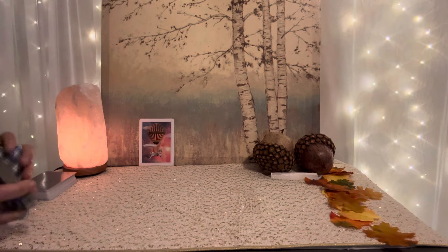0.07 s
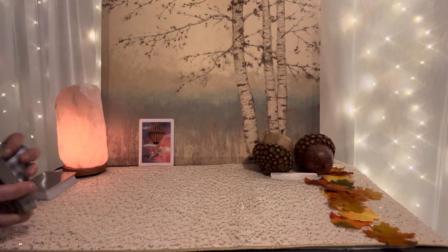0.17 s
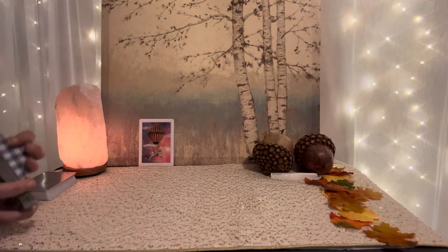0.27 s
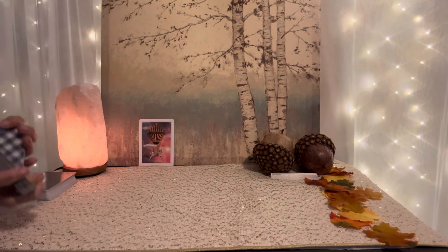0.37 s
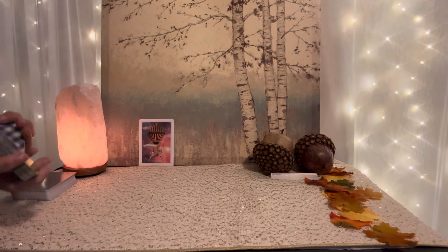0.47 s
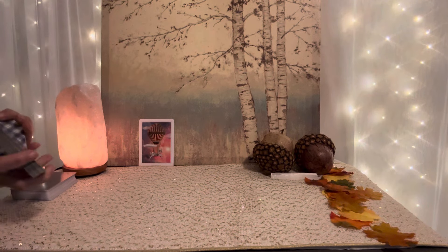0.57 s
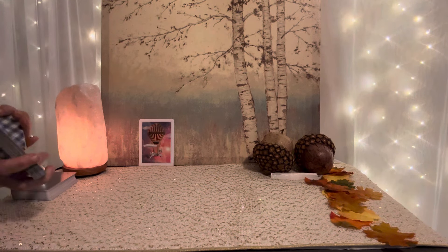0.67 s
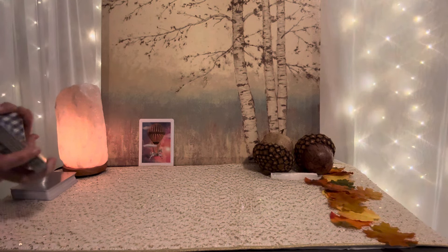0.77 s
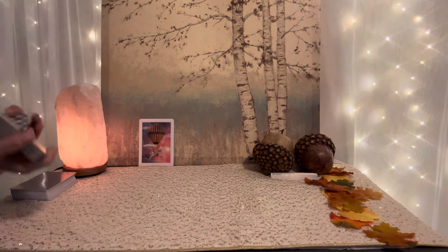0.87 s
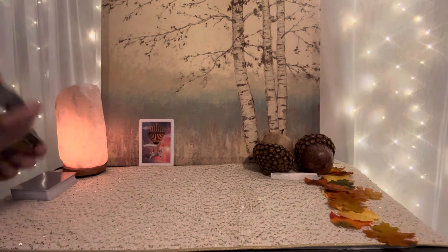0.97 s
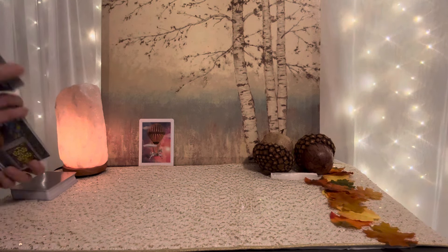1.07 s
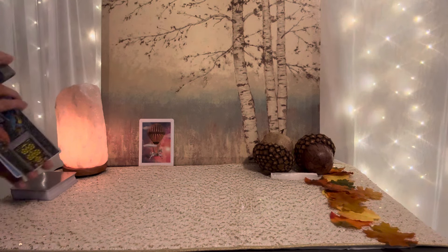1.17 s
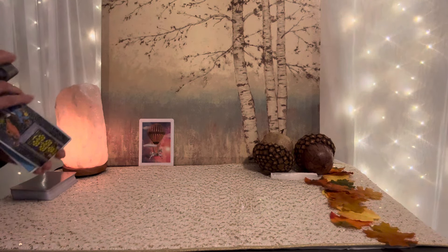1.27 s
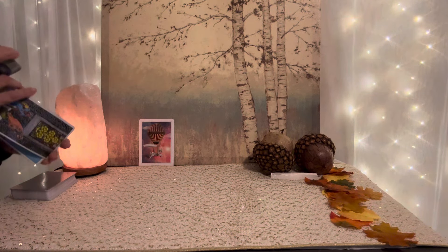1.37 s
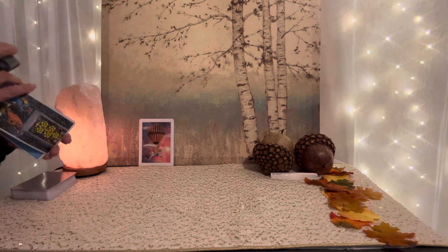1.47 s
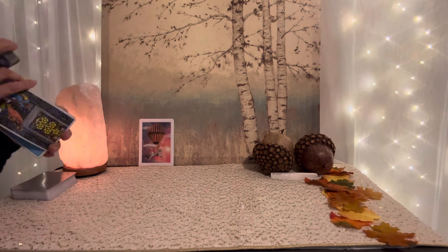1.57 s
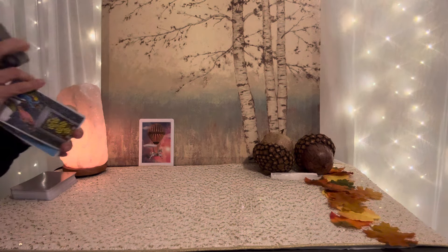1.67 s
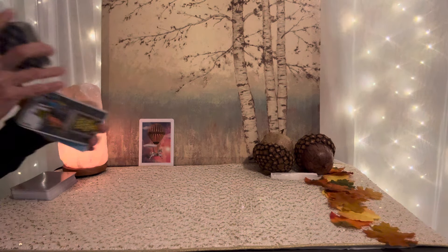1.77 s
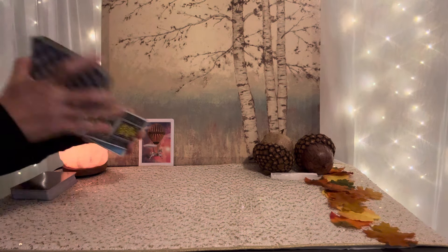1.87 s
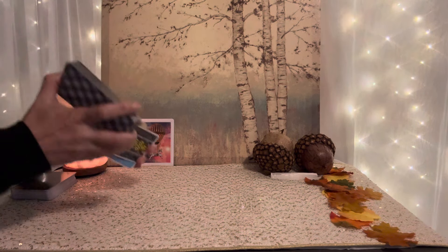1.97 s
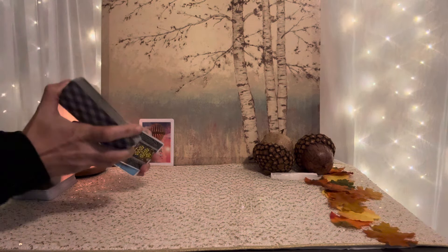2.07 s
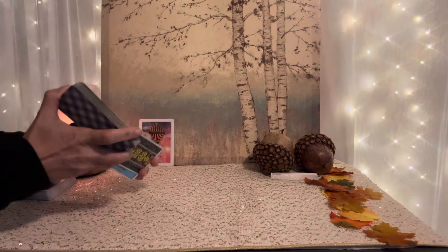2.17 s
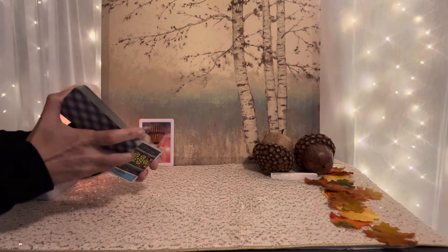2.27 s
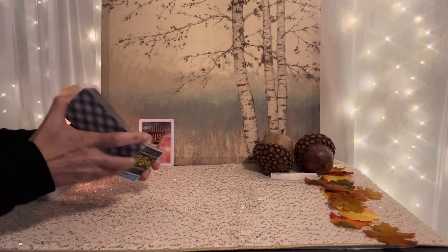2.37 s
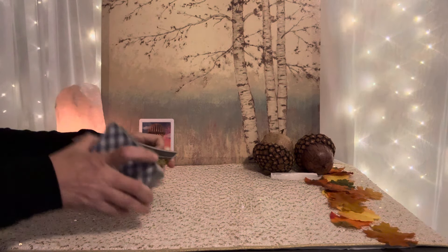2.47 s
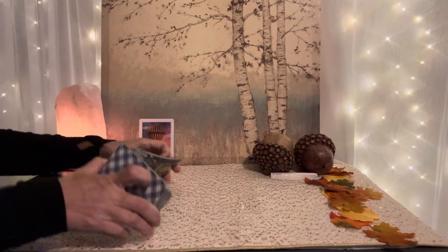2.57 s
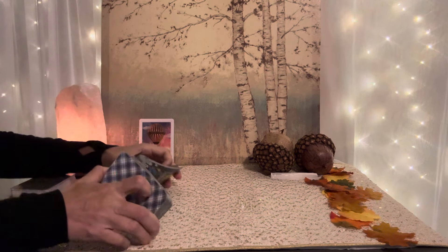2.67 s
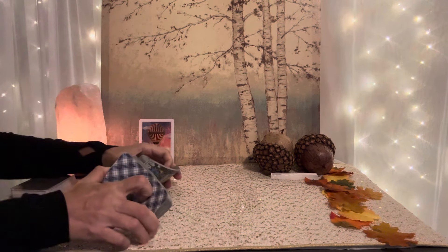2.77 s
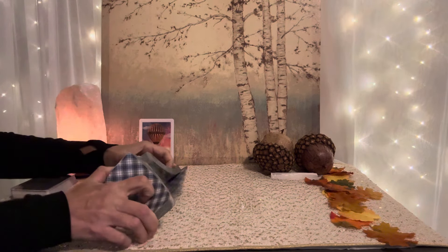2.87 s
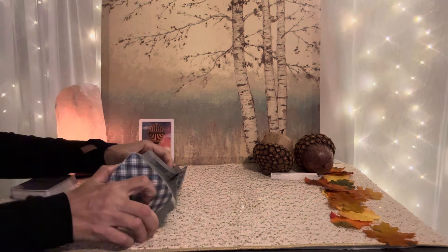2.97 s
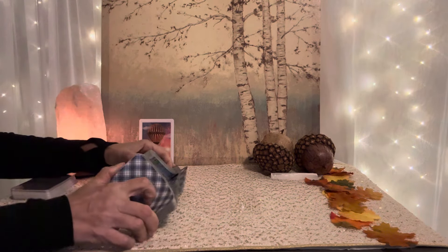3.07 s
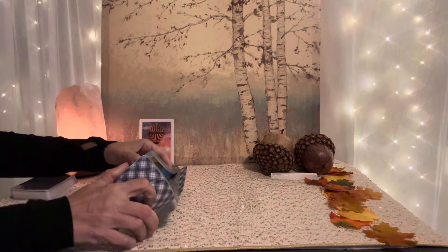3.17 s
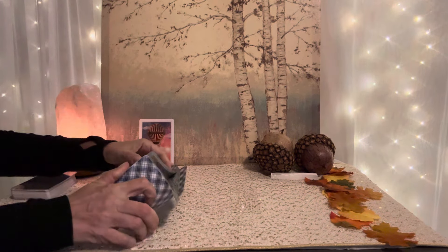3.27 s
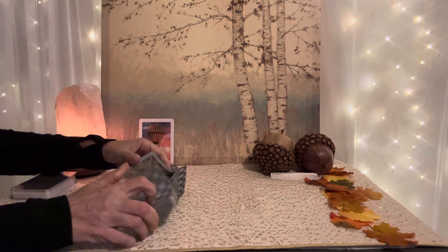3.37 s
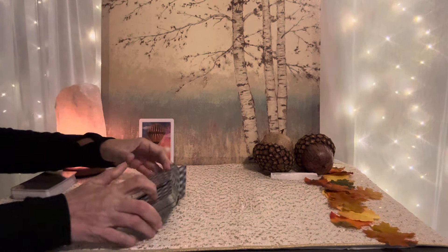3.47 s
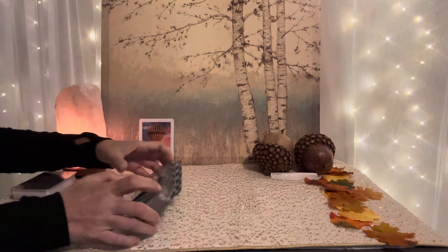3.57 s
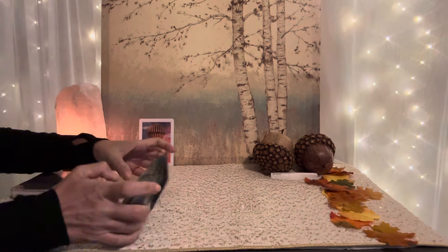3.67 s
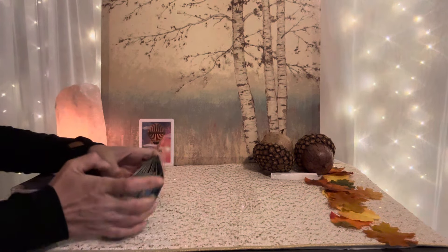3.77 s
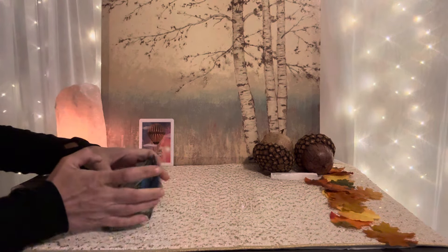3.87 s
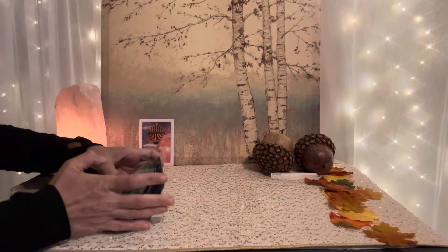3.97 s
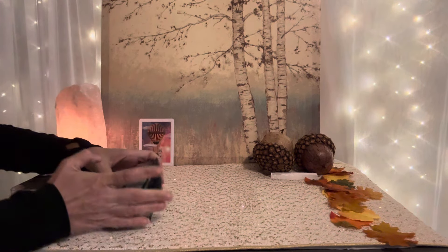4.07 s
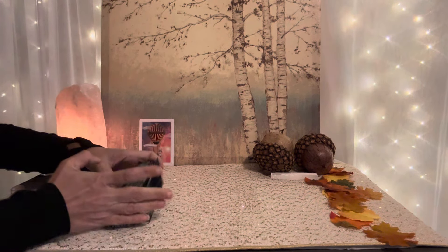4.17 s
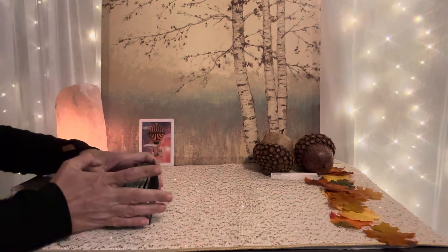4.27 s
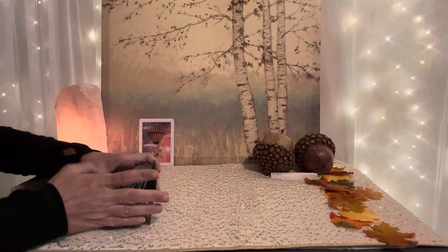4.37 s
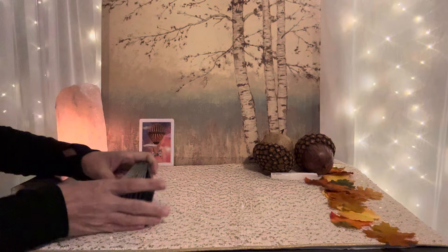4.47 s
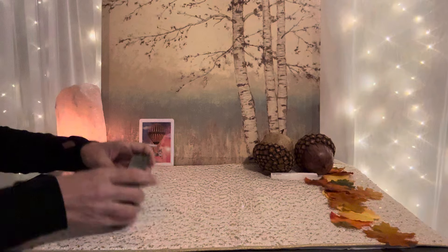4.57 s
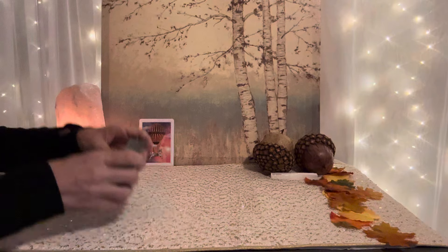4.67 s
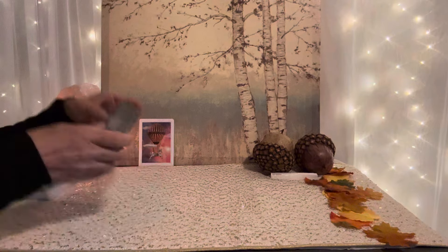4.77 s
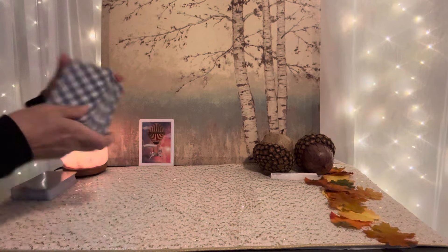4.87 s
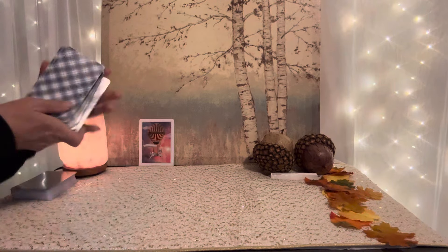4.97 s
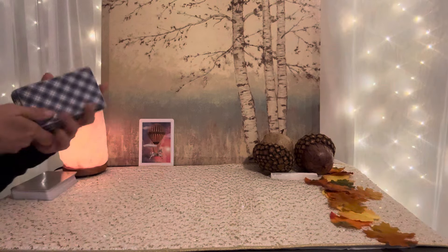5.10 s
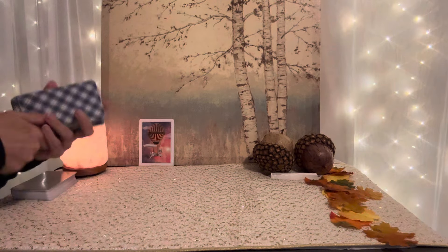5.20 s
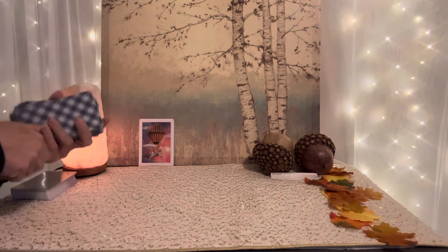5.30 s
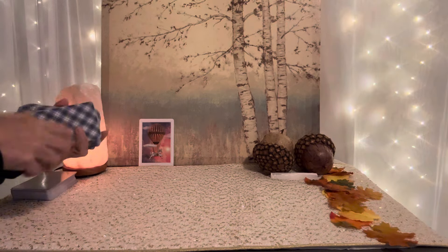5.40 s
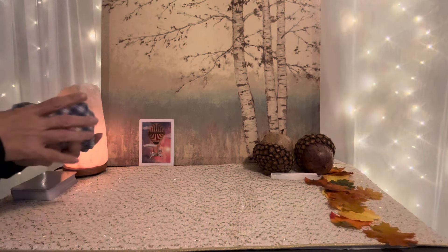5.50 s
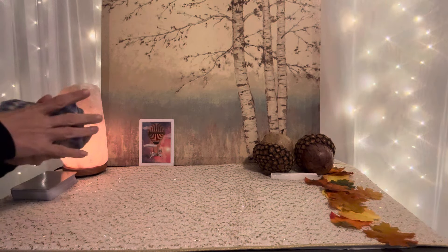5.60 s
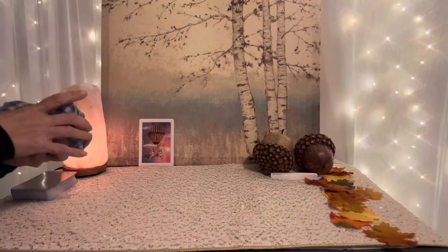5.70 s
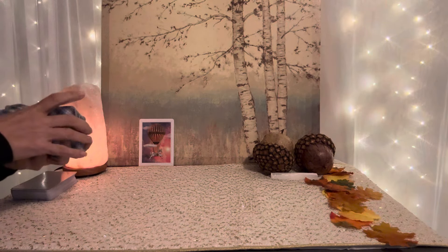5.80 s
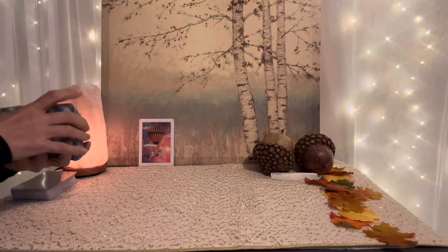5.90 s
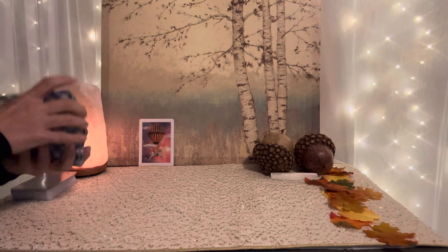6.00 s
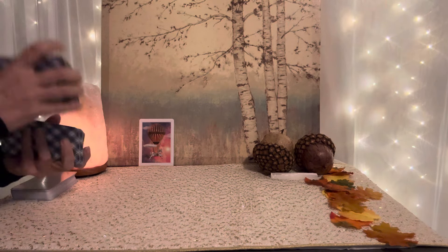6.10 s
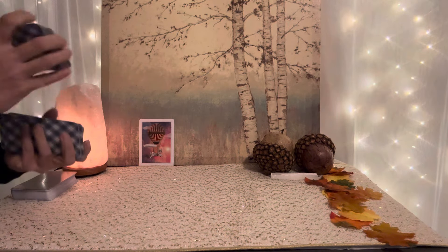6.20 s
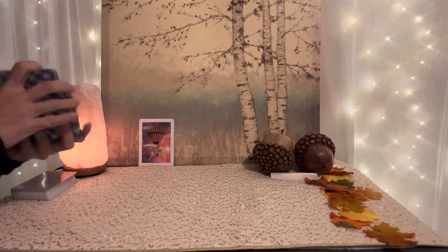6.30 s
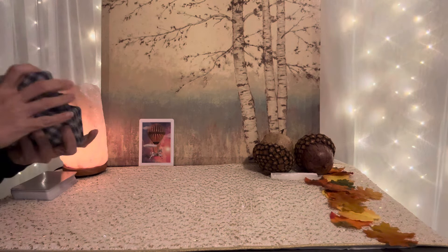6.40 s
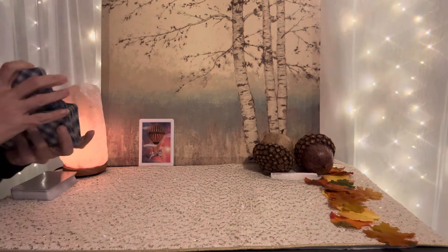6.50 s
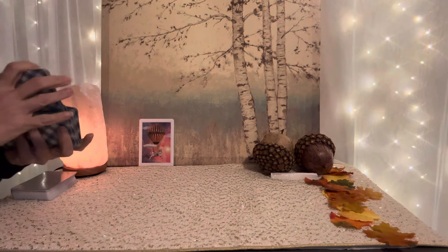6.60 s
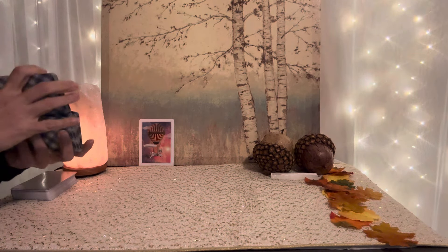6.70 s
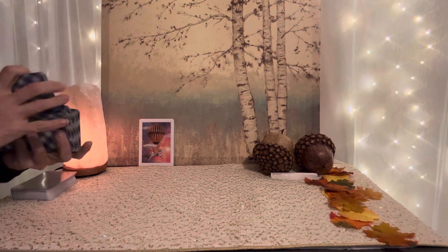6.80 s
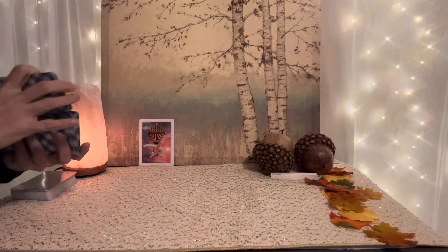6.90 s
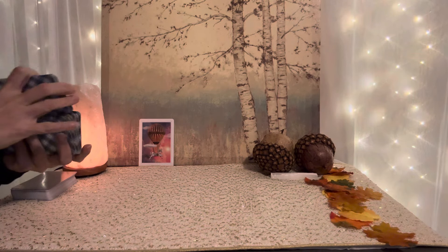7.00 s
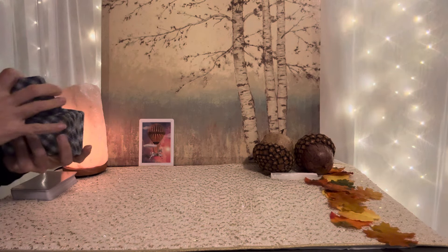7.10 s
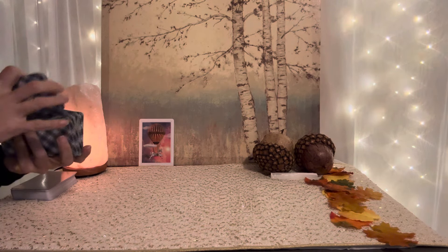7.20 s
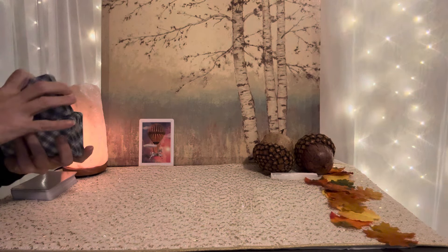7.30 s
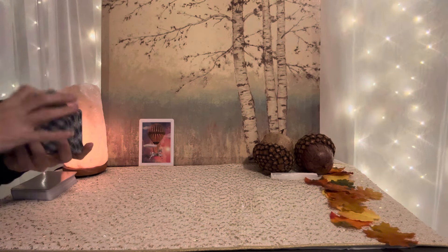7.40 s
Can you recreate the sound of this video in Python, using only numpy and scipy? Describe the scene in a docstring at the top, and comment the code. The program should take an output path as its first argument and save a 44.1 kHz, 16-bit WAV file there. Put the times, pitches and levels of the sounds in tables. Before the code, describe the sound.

In a small, quiet room with a low hum and rumble, cards slide and tick softly close to the microphone. A loud riffle follows, a fast burst of crisp snaps and papery rustle with muffled knocks on a covered table. Gentle taps and rubbing follow as the pack is pushed together. Near the end a packet lands with a sharp click and the cards swish in a hand shuffle.

```python
"""A deck of tarot cards is cut, riffled on a cloth-covered table, squared up and shuffled overhand.
Card edges snap and set the deck ringing, faces rub and rasp, and falling packets thump the table.
The two microphones of a phone are close to the hands, which work to the left or near centre.
The room is small and soft, with a short tail; a faint low hum, rumble and hiss lie underneath."""
import sys
import numpy as np
from scipy import signal
from scipy.fft import rfft, irfft, next_fast_len
from scipy.io import wavfile
from scipy.ndimage import uniform_filter1d, map_coordinates

SR = 44100
rng = np.random.default_rng(int(sys.argv[2]) if len(sys.argv) > 2 else 0)


def wav_record(signal):
    """Record a signal, one row per channel, as 16-bit PCM in the file named by sys.argv[1]."""
    frames = np.transpose(np.atleast_2d(signal))
    bounded = np.clip(frames, -1, 1)
    # unit amplitude maps onto the largest positive 16-bit level
    quanta = np.round(bounded * 32767).astype(np.int16)
    wavfile.write(sys.argv[1], SR, quanta)


N = 328545
TIME = np.arange(N) / SR
CONTROL_TIME = TIME[::32]

# Card edges snapping free or landing.
# Each row: start in seconds, body level in dB, pitch in Hz, crack level in dB.
CARD_SNAPS = [(0.1918, -58.5, 1060, -76), (0.9325, -54, 1700, -54), (1.5749, -60, 434, -74),
              (2.0928, -46.5, 2670, -51.5), (2.1431, -66.5, 1020, -61), (2.2106, -54.5, 1330, -54),
              (2.823, -57.5, 560, -72), (2.848, -58, 1190, -66), (2.8658, -49.5, 1380, -53),
              (2.8804, -34.5, 600, -45), (2.888, -42.5, 1020, -54), (2.8978, -31, 1510, -35.5),
              (2.9159, -29.5, 540, -45), (2.94, -34, 909, -44), (2.9716, -24, 540, -45.5),
              (2.986, -28, 1880, -31.5), (2.989, -25, 1323, -37.5), (3.009, -27.5, 1180, -39.5),
              (3.0126, -29.5, 1387, -31), (3.0178, -20.5, 2092, -24.5), (3.049, -33, 1506, -42),
              (3.0547, -18.5, 1447, -26), (3.0659, -36.5, 1804, -21), (3.0835, -18.5, 1090, -37.5),
              (3.1056, -15.5, 1660, -29.5), (3.1157, -26, 1482, -30), (3.1349, -18, 865.5, -34),
              (3.1416, -15.5, 1130, -21), (3.1518, -20, 1797, -29.5), (3.1591, -22, 1219, -20.5),
              (3.1996, -23, 1022, -34), (3.2215, -18, 1690, -17.5), (3.2641, -15.5, 850, -28.5),
              (3.295, -22.5, 970, -30), (3.2981, -15.5, 1850, -18.5), (3.3091, -17.5, 1114, -23.5),
              (3.314, -13, 2130, -24.5), (3.316, -19.5, 2350, -24.5), (3.372, -29.5, 1770, -36),
              (3.3758, -20, 4900, -17), (3.4008, -23, 950, -36.5), (3.4519, -26, 750, -42),
              (3.4553, -30.5, 893, -34), (3.6226, -55, 621, -61), (3.7593, -54.5, 1122, -91),
              (3.779, -52.5, 1125, -77), (3.7992, -54.5, 1093, -56), (4.4249, -58.5, 1228, -68),
              (4.5759, -57.5, 1563, -62.5), (4.6321, -49, 3050, -49.5), (4.839, -66.5, 1380, -49.5),
              (4.9367, -63.5, 880, -66.5), (5.2399, -51.5, 2945, -53), (5.4993, -77, 459.6, -74),
              (6.0979, -69.5, 2783, -63), (6.289, -34.5, 1310, -42), (6.3032, -28, 2440, -31),
              (6.307, -33, 977, -64), (6.842, -55.5, 2170, -67.5), (7.0247, -41.5, 940, -56)]


def card_snaps(decay_cycles=0.86, contact_s=0.0026, crack_s=0.0015, flutter_db=-20, flutter_s=0.0049):
    """Each card cracks, bends for a few cycles, flutters against its neighbours and rings the deck."""
    # Colours of a snap's body and of its crack. Each row: frequency in Hz, gain in dB.
    body_colour = [(200, -2), (500, -0.5), (2800, 2), (3300, 0.5), (5000, -8.5), (9000, -23)]
    crack_colour = [(2000, -18.5), (3900, 0), (5500, 0.5), (8000, -4.5), (11000, 1.5), (13500, -12),
                    (16000, -17)]
    bodies, cracks, t = np.zeros(N), np.zeros(N), TIME[:6144]
    burst_gain = np.sqrt(0.004 * SR / len(t))  # turns rms 1 into the energy of a 4 ms burst
    attack = 1 - np.exp(-t / 0.00018)
    for start, body_db, hz, crack_db in CARD_SNAPS:
        rough, fine = rng.standard_normal((len(t), 2)).T
        flutter = amp(flutter_db) * np.exp(-t / flutter_s)
        bend = np.sin(2 * np.pi * hz * t) * np.exp(-t * hz / decay_cycles)
        around_pitch = [(hz / 8, -22), (hz / 2, -4), (hz, 0), (hz * 2, -3), (hz * 5, -16)]
        contact = colour(rough * (np.exp(-t / contact_s) + flutter), around_pitch)
        body = burst_gain * unit(unit(bend) + unit(contact))
        crack = colour(fine * (np.exp(-t / crack_s) + flutter) * attack, crack_colour)
        add(bodies, start, amp(body_db) * (body + amp(-19) * deck_ring(t, hz)))
        add(cracks, start, amp(crack_db) * burst_gain * unit(crack))
    return colour(bodies, body_colour) + cracks


def deck_ring(t, snap_hz, reach_octaves=0.53):
    """The stack rings most near the pitch of the snap, weighted anew by where the card strikes."""
    # Modes of the stacked cards. Each row: frequency in Hz, relative level in dB, t60 in seconds.
    deck_modes = [(310, -4, 0.12), (472.3, 8, 0.098), (568, 6.5, 0.45), (755, -4.5, 0.32), (858, -3, 0.41),
                  (970, 1.5, 0.074), (1080, 0, 0.033), (1830, -1.5, 0.062), (2140, -2.5, 0.038),
                  (2550, -3, 0.13), (2720, -4, 0.12)]
    hz, db, t60 = np.transpose(deck_modes)[:, :, None]
    weight, detune = rng.standard_normal((len(deck_modes), 2)).T[:, :, None]
    strike = np.sign(weight) * np.sqrt(np.abs(weight))
    drive = strike / (1 + (np.log2(hz / snap_hz) / reach_octaves) ** 2)
    tones = np.sin(2 * np.pi * hz * (1 + 0.0063 * detune) * t)
    return np.sum(amp(db) * drive * tones * decay(t, t60), axis=0)


def sliding(riffle_start_s=2.88, riffle_full_s=3.08, riffle_release_s=3.41, slide_s=0.015):
    """Gains of faces, edges and the pack's hollow: riffle, snapped cards and strokes add in power."""
    # Packets sliding over the deck. Each row: fastest moment, rise and fall in seconds,
    # face level in dB, then edge hiss and hollow of the pack in dB relative to the face.
    strokes = [(0.032, 0.057, .06, -83.5, 9.5, 9), (0.195, 0.033, 0.055, -74.5, -15, 7),
               (0.365, 0.048, .07, -71, -6.5, -2), (0.796, 0.041, .12, -78.5, 3.5, 0.5),
               (0.934, 0.038, 0.076, -64, 3.5, -1.5), (1.09, .05, .05, -77, 11, -1),
               (1.31, 0.21, .13, -75.5, -1, -2.5), (1.48, 0.11, .1, -83, 0, 4),
               (1.605, 0.07, 0.12, -71.5, 4.5, -15), (1.76, 0.052, .05, -80.5, 1, -12),
               (1.869, .06, 0.065, -89.5, 12, 1.5), (2.1, 0.023, .13, -65, 1, 2),
               (2.214, 0.055, .09, -62, -7, 7.5), (2.555, 0.033, 0.075, -67, 4.5, 0),
               (2.82, 0.055, 0.074, -73, -18, 12), (2.9, 0.041, 0.077, -46.5, -5.5, 12),
               (3.148, 0.09, .04, -37, -2, 12.5), (3.318, 0.04, 0.081, -25.5, -7, -9),
               (3.459, .015, .06, -40, -18, -1), (3.659, 0.17, .12, -74.5, -8, 12.5),
               (3.832, .11, 0.13, -55, 0.5, 1.5), (4.07, 0.074, 0.092, -60.5, -3.5, -0.5),
               (4.24, 0.11, 0.083, -67, -4, 2.5), (4.425, 0.043, .09, -67, -1, 2),
               (4.57, 0.31, 0.22, -67.5, -2.5, 6), (4.78, 0.18, 0.064, -78.5, 11.5, 2),
               (4.845, 0.044, 0.074, -65, 5.5, 0), (4.9, 0.045, .08, -62, 7, -13),
               (4.94, 0.057, 0.036, -62, -15.5, -2.5), (5.04, 0.1, .1, -73.5, 10, -11),
               (5.108, 0.038, 0.11, -71.5, 8.5, 0), (5.24, .06, 0.055, -67, 10, -10),
               (5.309, .05, .08, -77, 8, -3), (5.94, 0.17, 0.2, -74, 5.5, -4),
               (6.09, 0.095, .06, -77.5, 10, -2), (6.29, .005, 0.011, -37.5, -10, -9),
               (6.309, 0.0062, .13, -46.5, -10.5, -7.5), (6.63, .1, 0.092, -88, 5.5, 4),
               (6.765, 0.087, .09, -66, -0.5, -5), (6.909, 0.087, 0.08, -65.5, 3, -1.5),
               (7.07, 0.11, 0.22, -59, -7, -3.5), (7.219, 0.092, .09, -60.5, -4, 1),
               (7.385, 0.064, 0.084, -53, -0.5, -12.5)]
    t = CONTROL_TIME
    # The halves rub as they interleave: pressure builds, holds and is let go.
    build_db = -65.5 * np.maximum(riffle_full_s - t, 0)
    release_db = -175 * np.maximum(t - riffle_release_s, 0)
    loose_power = (t > riffle_start_s) * amp(-39 + build_db + release_db) ** 2
    for start, db, _, _ in CARD_SNAPS:  # each snapped card slides on for a moment
        loose_power += (t > start) * (amp(db - 22.5) * np.exp(-np.abs(t - start) / slide_s)) ** 2
    power = np.outer(amp([0, -0.5, 5.5]) ** 2, loose_power)  # face, edge, hollow
    for peak_s, rise_s, fall_s, db, edge_db, hollow_db in strokes:
        power += np.outer(amp(db) * amp([0, edge_db, hollow_db]), swell(peak_s, rise_s, fall_s)) ** 2
    return [smooth(np.sqrt(part)) + 1e-9 for part in power]


def card_rubbing(face, edge, hollow, grain_db=4, grain_rate=1100, catch_db=2, catch_rate=110):
    """Faces, edges and the pack's hollow sound as fibres catch and slip, coarser under more pressure."""
    # Colours of card face, card edge and the air in the pack. Each row: frequency in Hz, level in dB.
    face_colour = [(700, -20.5), (1050, -7.5), (1500, 3.5), (2400, 4.5), (3300, 1), (4600, -10.5),
                   (7000, -18.5)]
    edge_colour = [(2000, -18.5), (3300, 0.5), (4600, 0.5), (7000, -7), (9000, -0.5), (11500, -4.5),
                   (13500, -7), (16800, -15.5)]
    hollow_colour = [(150, -11), (330, 1), (550, 3), (800, -1.5), (1150, -2), (1700, -28)]
    pressure = np.clip((20 * np.log10(face) + 83) / 25, 0, 1)
    slip_db = pressure * (grain_db * walk(grain_rate) + catch_db * walk(catch_rate))
    slips = amp(slip_db) / np.sqrt(uniform_filter1d(amp(2 * slip_db), size=4096))
    paper = fibres([(face_colour, face * amp(-1)), (edge_colour, edge * amp(-2))])
    # The air in the pack rings on through the single slips.
    pack = unit(colour(slips * rng.standard_normal(N), hollow_colour))
    return slips * paper + hollow * amp(-3) * pack


def fibres(surfaces, flare_db=3, flare_rate=70):
    """Friction of (colour, gain) surfaces, in half-octave bands that flare as the contact shifts."""
    centres = 180 * 2 ** np.arange(0, 6.6, 0.5)
    shares = []
    for points, _ in surfaces:
        hz, db = np.transpose(points)
        band_power = centres * amp(2 * np.interp(np.log(centres), np.log(hz), db, -80, -80))
        shares.append(band_power / band_power.sum())
    out = np.zeros(N)
    for k, hz in enumerate(centres):
        power = sum(share[k] * gain ** 2 for share, (_, gain) in zip(shares, surfaces))
        band = butter(rng.standard_normal(N), 2, [hz / 1.19, hz * 1.19], "bandpass")
        out += np.sqrt(power) * unit(band * amp(flare_db * walk(flare_rate)))
    return out


def card_drags(rough_db=3, rough_rate=160):
    """Uneven friction drives one card resonance, its pitch set by the free length of the card."""
    # Cards rasping or squeaking along the deck.
    # Each row: loudest moment, rise and fall in seconds, centre and width in Hz, level in dB.
    drags = [(.345, .025, 0.025, 2740, 895, -66), (.78, .007, .009, 3080, 450, -62.5),
             (1.083, 0.037, 0.037, 4900, 1200, -70), (1.26, 0.19, 0.21, 4160, 1880, -76),
             (1.32, 0.15, 0.09, 2560, 600, -66.5), (1.535, 0.1, 0.12, 2400, 695, -66.5),
             (1.64, 0.083, 0.21, 2650, 1190, -70.5), (2.795, .008, 0.017, 2570, 250, -66),
             (4.93, 0.022, 0.021, 2020, 708, -59.5), (6.842, 0.0055, 0.021, 2230, 597, -54.5),
             (7.39, 0.087, 0.12, 4130, 2003, -56.5), (7.05, 0.23, .4, 1410, 170.3, -67.5),
             (7.43, 0.14, .1, 1360, 292, -80)]
    out = np.zeros(N)
    friction = rng.standard_normal(N) * amp(rough_db * walk(rough_rate))
    for peak_s, rise_s, fall_s, hz, width_hz, db in drags:
        spread = np.exp(width_hz / hz / 2)
        ring = butter(friction, 2, [hz / spread, hz * spread], "bandpass")
        out += amp(db) * smooth(swell(peak_s, rise_s, fall_s)) * unit(ring)
    return out


def table_thumps(rise_cycles=0.43, sway_hz=58, sway_db=-13, sway_s=0.02):
    """The cloth softens each blow to a few cycles; the whole table top sways after it."""
    # Packets and hands knocking the table. Each row: start in seconds, level in dB, pitch in Hz.
    blows = [(0.002, -39.5, 138), (0.195, -48, 304), (1.574, -54, 330), (2.802, -40.5, 142),
             (2.888, -26, 163), (2.998, -24, 149), (3.022, -29.5, 91), (3.073, -26, 110.4),
             (3.117, -21.5, 130), (3.152, -16.5, 162.5), (3.204, -19, 203), (3.232, -14, 128),
             (3.264, -24.5, 145), (3.321, -22.5, 64.42), (3.387, -17, 122), (3.414, -19, 89.4),
             (3.453, -28.5, 138.6), (3.618, -34.5, 116), (3.641, -37, 246), (3.663, -39, 131.6),
             (3.724, -37, 148), (3.82, -44, 108.4), (4.116, -45.5, 152.8), (4.582, -38.5, 187.4),
             (5.623, -47.5, 120.9)]
    out, t = np.zeros(N), TIME[:8192]
    sway = amp(sway_db) * t / sway_s * np.exp(1 - t / sway_s) * np.sin(2 * np.pi * sway_hz * t)
    for start, db, hz in blows:
        age = t * hz / rise_cycles
        knock = age * np.exp(1 - age) * np.sin(2 * np.pi * hz * t)
        add(out, start, -amp(db) * (knock + sway))
    return out


def low_background_swell(face, growth=0.88, smear_s=0.14):
    """The low hum and rumble rise while the cards move."""
    # Colour of this low noise. Each row: frequency in Hz, gain in dB.
    low_colour = [(30, -20.5), (52, -4.5), (75, -8.5), (110, -7), (150, 3), (220, -8.5), (330, -13.5),
                  (600, -38), (1500, -65.5)]
    rise = uniform_filter1d((face / amp(-60)) ** growth, size=int(smear_s * SR))
    return amp(-61) * rise * unit(colour(rng.standard_normal(N), low_colour))


def room(x, t60_low=0.23, t60_high=0.19, onset_s=0.0064, alike_below_hz=1500):
    """Table, backdrop and walls reflect; the treble dies sooner and differs more between microphones."""
    # Colour of the reflections. Each row: frequency in Hz, gain in dB.
    room_colour = [(60, -8), (200, 9.5), (600, -5), (2500, -0.5), (5000, 4), (12000, -4.5), (16000, 0.5)]
    t = TIME[:SR // 2]
    mid, side = rng.standard_normal((2, len(t)))
    side = side - 0.88 * butter(side, 1, alike_below_hz)
    noise = np.array([mid + side, mid - side])
    low = butter(noise, 1, 2500)
    tail = low * decay(t, t60_low) + (noise - low) * decay(t, t60_high)
    onset = 1 - np.exp(-(t / onset_s) ** 2)
    response = unit(colour(tail * onset, room_colour)) / np.sqrt(len(t))
    return signal.fftconvolve(x[None], response, axes=1)[:, :N]


def room_tone(hum_hz=151.5, hum_db=-66, waver_db=2.84, rumble_db=-59.5, hiss_db=-86):
    """A wavering hum and a swelling rumble, nearly alike at both microphones, with a faint hiss."""
    # Colours of the rumble and the hiss. Each row: frequency in Hz, gain in dB.
    rumble_colour = [(20, -32.5), (36, -18.5), (46, 2.5), (55, 8.5), (66, -9), (85, -13.5), (120, -11.5),
                     (160, -19), (210, -20.5), (310, -25.5), (450, -39.5), (1200, -58.5)]
    hiss_colour = [(200, 2), (700, 1.5), (1500, -9.5), (3000, -8.5), (6000, -15), (12000, -16),
                   (16000, -21)]
    # Rumble swells. Each row: loudest moment in seconds, equal rise and fall in seconds, level in dB.
    rumble_swells = [(0.12, 0.53, -58), (0.73, 0.085, -56), (0.98, .16, -56), (2.24, 0.17, -57.5),
                     (3.8, .3, -55.5), (4.59, 0.16, -50), (6.9, 0.093, -54.5), (7.07, 0.089, -50.5),
                     (7.23, 0.12, -47.5)]
    hum = unit(np.sin(2 * np.pi * hum_hz * TIME + 0.35 * walk(10)))
    hum *= amp(hum_db + waver_db * walk(7))
    swell_power = sum((amp(db) * swell(peak_s, span, span)) ** 2 for peak_s, span, db in rumble_swells)
    rumble_gain = smooth(np.sqrt(amp(rumble_db) ** 2 + swell_power))
    rumble = rumble_gain * stereo_noise(rumble_colour, side_db=-24)
    hiss = amp(hiss_db) * stereo_noise(hiss_colour, side_db=-5)
    return hum + rumble + hiss


def stereo_noise(points, side_db):
    """Steady coloured noise, with a part that differs between the microphones."""
    mid, side = colour(rng.standard_normal((2, N)), points)
    return unit(mid) + amp(side_db) * unit(side) * np.array([[1], [-1]])


def amp(db):
    """Decibels to gain."""
    return np.exp(np.asarray(db) * (np.log(10) / 20))


def unit(x):
    """Scale to rms 1."""
    return x / np.sqrt(np.mean(x ** 2))


def decay(t, t60):
    """Gain that falls 60 dB in t60 seconds."""
    return np.exp(-np.log(1000) * t / t60)


def swell(peak_s, rise_s, fall_s, drop_db=22, roundness=1.4):
    """Slow gain that peaks at peak_s and is drop_db down rise_s before and fall_s after."""
    away = np.maximum((peak_s - CONTROL_TIME) / rise_s, (CONTROL_TIME - peak_s) / fall_s)
    return amp(-drop_db * np.minimum(away, 10) ** roundness)


def smooth(control):
    """Bring a slow control to the full sample rate."""
    return np.interp(TIME, CONTROL_TIME, control)


def walk(rate):
    """Random wander of rms 1 that turns rate times a second."""
    steps = rng.standard_normal(N // 8)
    return unit(np.interp(TIME * rate, np.arange(len(steps)), steps))


def butter(x, order, hz, kind="lowpass"):
    """Filter with a flat passband."""
    return signal.sosfilt(signal.butter(order, hz, kind, fs=SR, output="sos"), x)


def colour(x, points):
    """Minimum-phase filter through (Hz, dB) points."""
    size = 16384 if x.shape[-1] > SR else 2048
    hz, db = np.transpose(points)
    log_gain = np.interp(np.log(np.fft.rfftfreq(size, 1 / SR) + 1), np.log(hz), np.log(amp(db)))
    cepstrum = irfft(log_gain)
    cepstrum[1:size // 2] *= 2
    cepstrum[size // 2 + 1:] = 0
    response = irfft(np.exp(rfft(cepstrum)))
    padded = next_fast_len(x.shape[-1] + size, real=True)
    return irfft(rfft(x, padded) * rfft(response, padded), padded)[..., :x.shape[-1]]


def add(track, start_s, sound):
    """Mix a sound into a track."""
    start = max(int(start_s * SR), 0)
    track[start:start + len(sound)] += sound[:max(N - start, 0)]


def scene():
    """Cards close in front of the two microphones, with the room and its hum behind."""
    # Where the hands are: left or near centre, with more or less room sound.
    # Each row: time in seconds, lag at the right microphone in ms, room send in dB.
    hand_positions = [(0, 0.16, -1.5), (1.7, 0.18, 0), (2.1, 0.033, -6), (2.9, 0.043, -3),
                      (3.5, 0.023, 0.5), (4.6, 0.037, -4), (5.2, .14, -0.5), (7.45, 0.12, 0)]
    times, lags, sends = np.transpose(hand_positions)
    lag_ms, send_db = np.interp(TIME, times, lags), np.interp(TIME, times, sends)
    face, edge, hollow = sliding()
    snaps = card_snaps()
    lows = table_thumps() + low_background_swell(face)
    friction = card_rubbing(face, edge, hollow) + card_drags()
    left = snaps + lows + friction
    right = map_coordinates(left, [np.arange(N) - lag_ms * SR / 1000], order=3)
    reflected = room(amp(send_db) * (amp(-5.5) * snaps + amp(-8) * friction + amp(-11) * lows))
    # A card rubs over its whole face, so each microphone hears a partly different grain.
    width = amp(-4) * card_rubbing(face, edge, hollow) * np.array([[1], [-1]])
    return np.array([left, right]) + width + reflected + room_tone()


def record(dry, ceiling=0.85, split_hz=6800, treble_lag_s=0.000212, low_cut_hz=43, top_hz=15900):
    """The loudest snaps are softly limited; the phone cuts the deepest bass and the highest treble."""
    size = next_fast_len(N + 64, real=True)
    limited = dry / (1 + (dry / ceiling) ** 4) ** 0.25
    left, right = rfft(limited, size)
    hz = np.fft.rfftfreq(size, 1 / SR)
    treble = 1 / (1 + (split_hz / (hz + 1)) ** 12)
    low_cut = 1 / (1 + (low_cut_hz / (hz + 1)) ** 12)
    # Above the split the right channel carries the left microphone, late and inverted.
    late_left = -left * np.exp(-2j * np.pi * hz * treble_lag_s)
    right = np.sqrt(1 - treble) * right + np.sqrt(treble) * late_left
    both = irfft(low_cut * np.array([left, right]), size)[:, :N]
    return signal.sosfilt(signal.ellip(8, 0.2, 70, top_hz, fs=SR, output="sos"), both)


dry = scene()
out = record(dry)
wav_record(out)
```